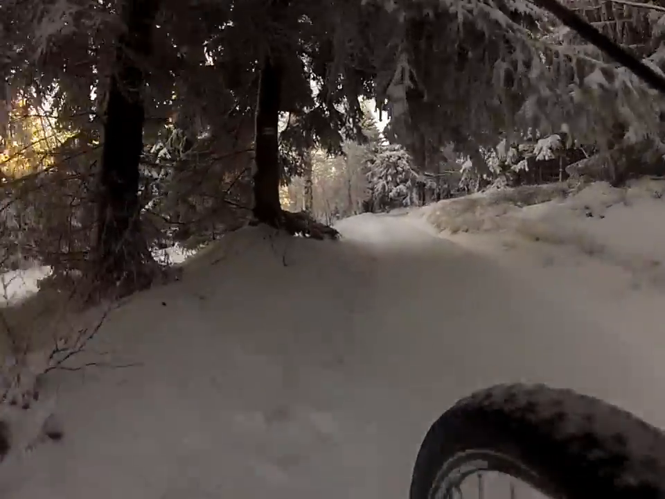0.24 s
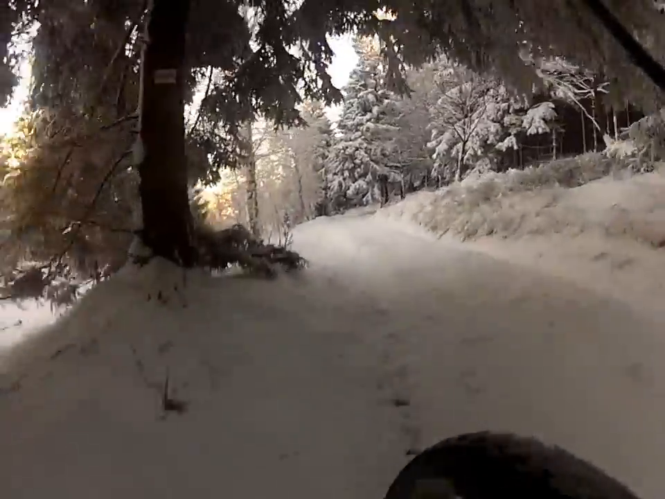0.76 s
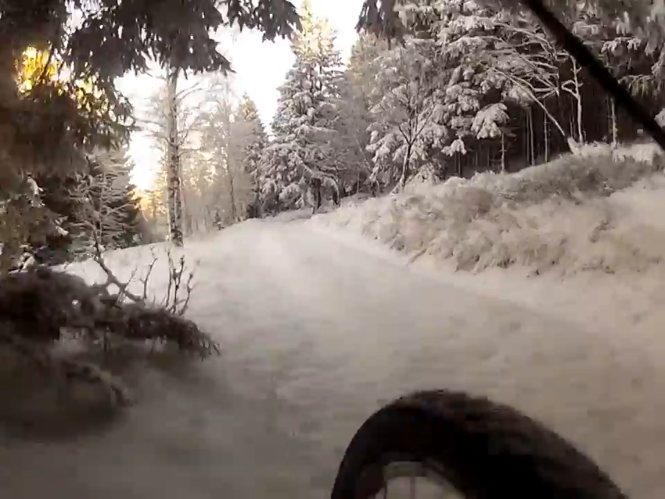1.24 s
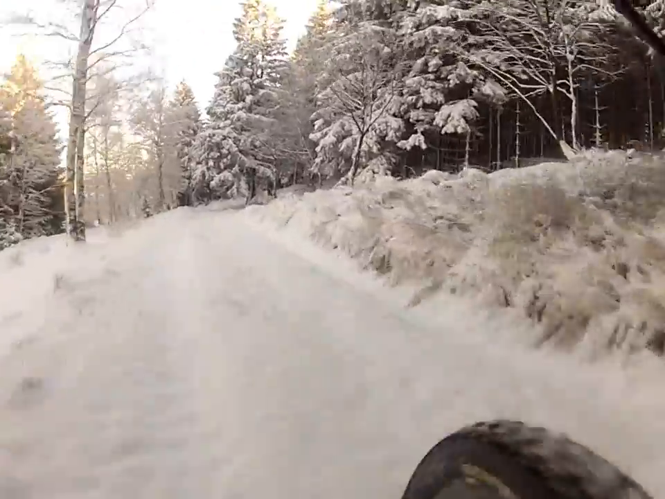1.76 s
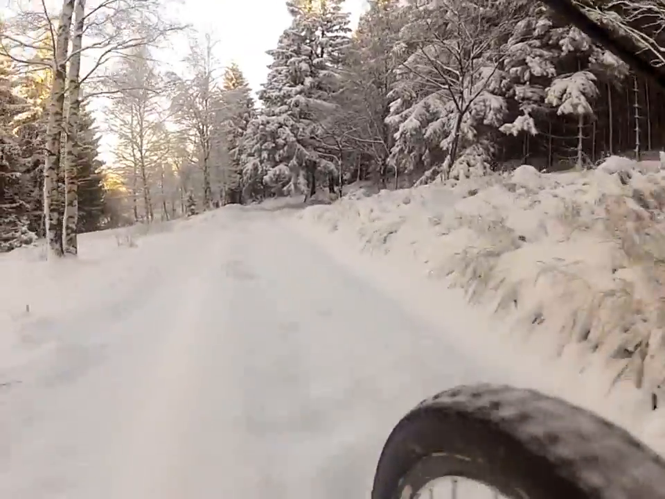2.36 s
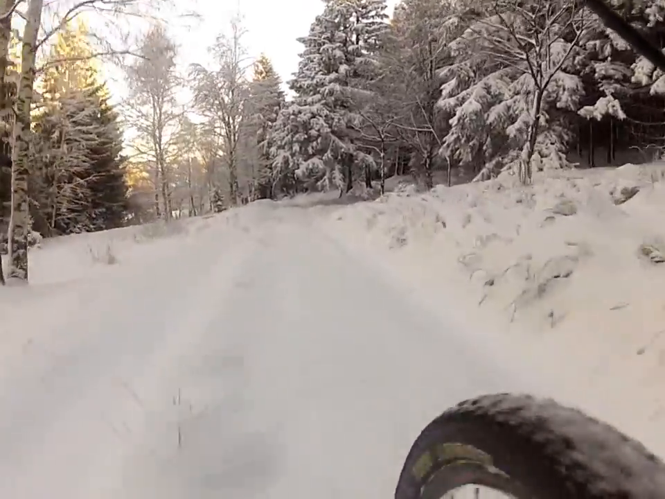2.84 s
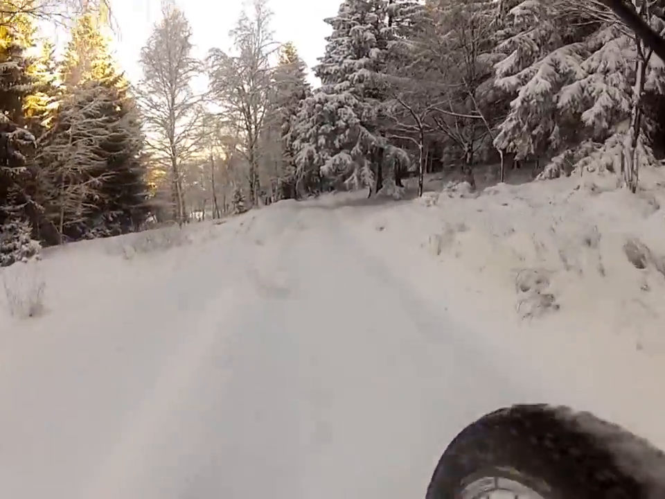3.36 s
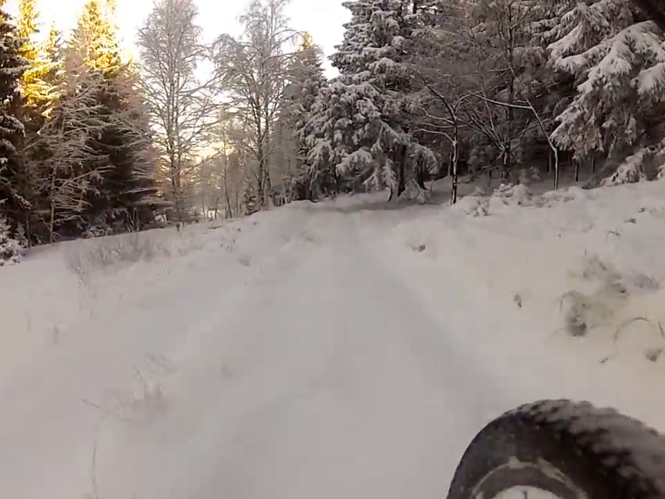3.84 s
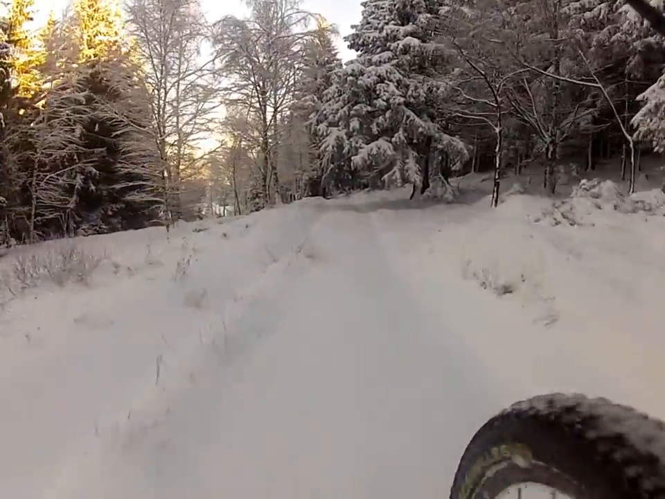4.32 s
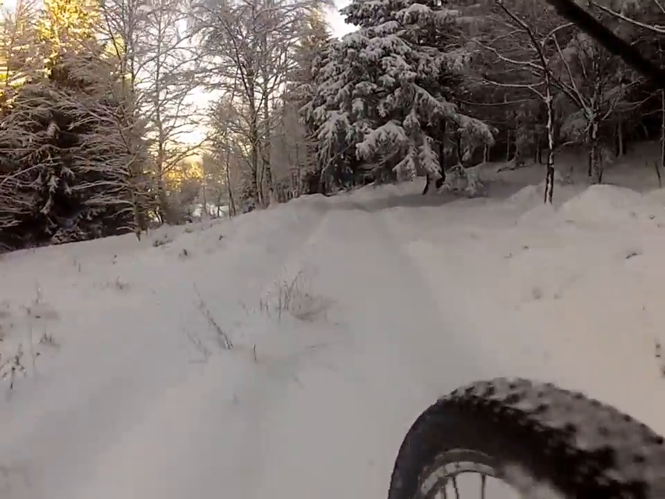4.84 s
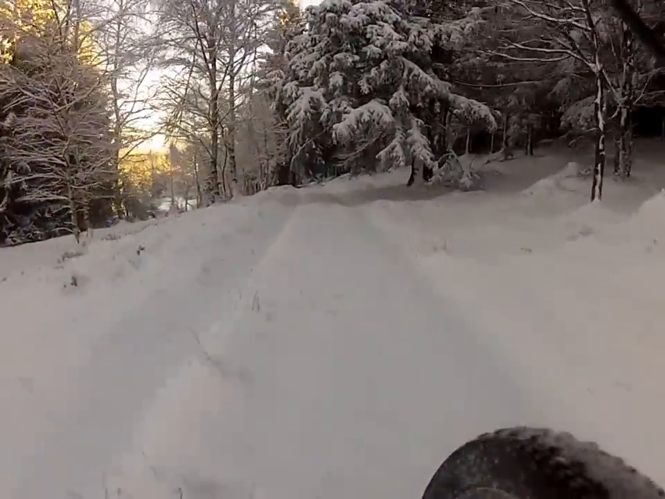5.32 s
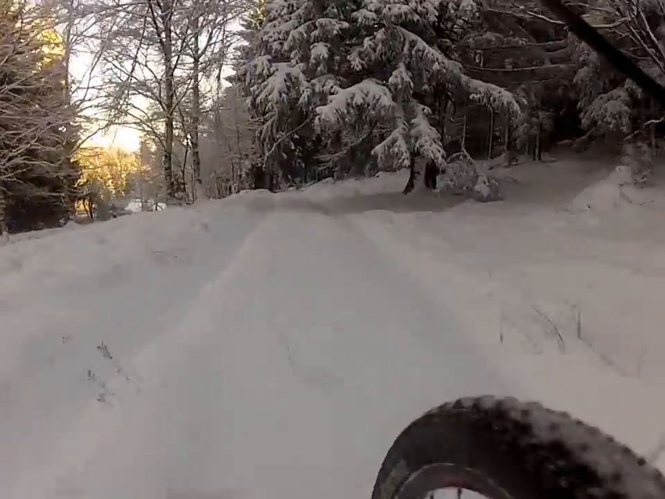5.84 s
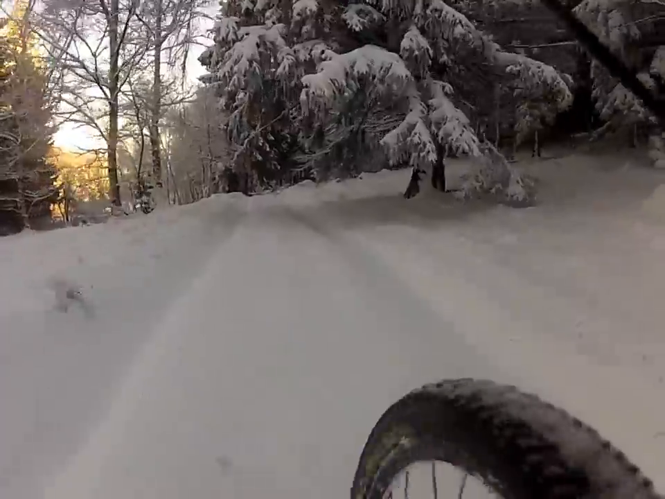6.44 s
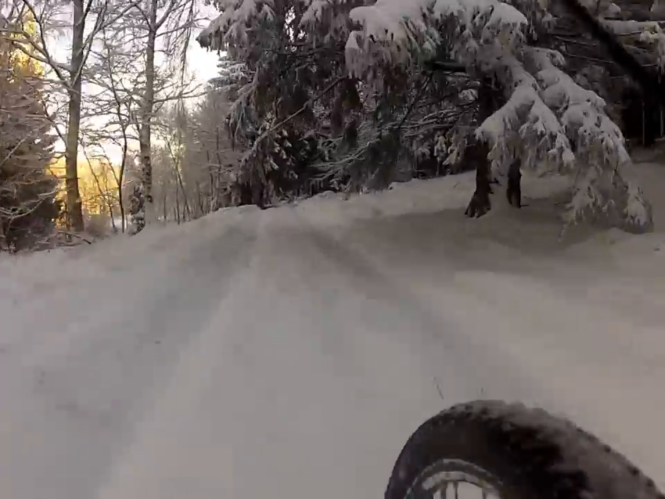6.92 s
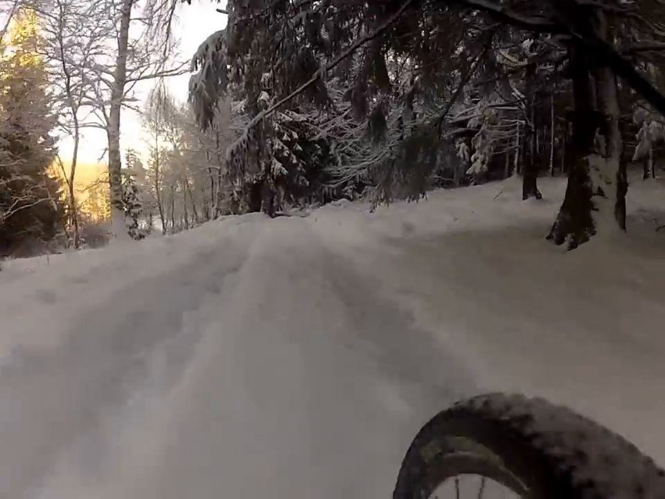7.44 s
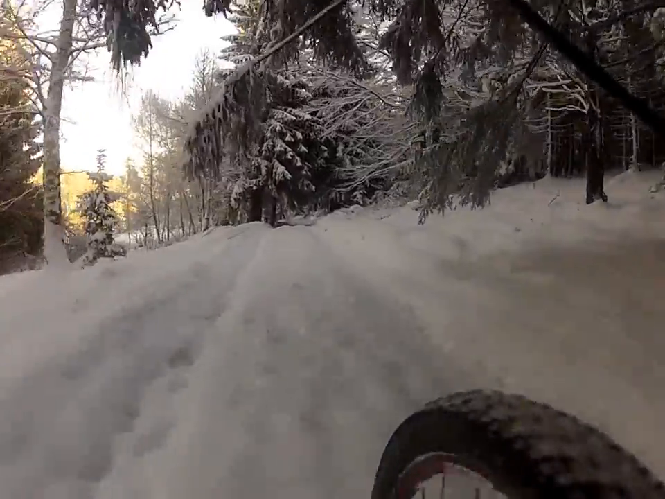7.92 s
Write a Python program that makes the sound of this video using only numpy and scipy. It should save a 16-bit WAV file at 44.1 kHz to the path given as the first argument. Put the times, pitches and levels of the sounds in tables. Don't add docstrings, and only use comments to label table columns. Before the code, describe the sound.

A bicycle rolls along a snowy forest track, picked up through the frame by a sealed camera mounted on it. A very low throb, nearly thirty pulses a second, surges and eases over tyre rumble and crackly snow crunch. A loose part buzzes harshly with the surges. Twig ticks, ice knocks and dull bumps cluster in the first two seconds, then come sparsely, with another hard clack around 5.5 seconds. No room echo.

```python
import sys
import numpy as np
from scipy import signal
from scipy.fft import rfft, irfft, next_fast_len
from scipy.io import wavfile
from scipy.ndimage import uniform_filter1d, minimum_filter1d

SR = 44100
rng = np.random.default_rng(int(sys.argv[2]) if len(sys.argv) > 2 else 0)


def magnitude_from_level(level_db):
    exponent = np.asarray(level_db, float) / 20
    return 10 ** exponent


def persist_wave(psi):
    counts = np.round(np.clip(psi, -1, 1) * 32767).astype(np.int16)
    wavfile.write(sys.argv[1], SR, np.atleast_2d(counts).T)


N = 360738

# (middle [s], peak level [dB], length [s], swing rate [Hz])
LURCHES = [(0.063, -16.5, 0.18, 28.9), (0.316, -10.5, 0.46, 28.68), (0.57, -16, 0.53, 28.38),
           (0.808, -7.8, 0.13, 28.08), (0.997, -6.5, 0.32, 26.66), (1.267, -10.5, 0.51, 30.43),
           (1.548, -7, 0.36, 28.0), (1.855, -8, 0.34, 29.8), (2.001, -19, 0.45, 28.2),
           (2.4, -18.2, 0.29, 29.5), (2.645, -22.5, 0.26, 29.25), (2.996, -5.5, 0.25, 27.52),
           (3.174, -8, 0.18, 27.5), (3.346, -11, 0.48, 28.52), (3.657, -5, 0.31, 26.88),
           (3.895, -15, 0.29, 29.8), (4.071, -7, 0.17, 27.79), (4.46, -11.5, 0.69, 27.32),
           (4.839, -4.0, 0.27, 28.18), (5.106, -13.5, 0.83, 29.91), (5.541, -12.5, 0.47, 27.6),
           (5.86, -15, 0.34, 31.54), (6.109, -11.5, 0.2, 28), (6.347, -8.5, 0.32, 29.55),
           (6.587, -10.5, 0.17, 29.82), (6.851, -12.5, 0.39, 27.97), (7.109, -11, 0.18, 30.4),
           (7.304, -11, 0.22, 26.82), (7.595, -11, 0.62, 29.97), (8.034, -12.9, 0.28, 28.7)]
# (middle [s], peak level [dB], length [s])
RUTS = [(0.677, -19, 0.17), (0.79, -14, 0.11), (0.969, -19.5, 0.95), (1.398, -15, 0.67), (1.664, -16, 0.18),
        (1.824, -15.5, 0.37), (2.941, -22.5, 0.16), (3.279, -23, 0.29), (3.547, -19, 0.15),
        (3.696, -20.5, 0.29), (4.59, -13, 0.12), (4.707, -16.5, 0.099), (4.774, -24, 0.6),
        (5.484, -21, 0.91), (6.35, -21, 0.11), (7.132, -25, 0.33)]
# (middle [s], peak level [dB], length [s])
RIPPLES = [(0.812, -21.5, 0.5), (1.096, -15.5, 0.059), (4.556, -23, 0.31), (5.135, -19.5, 0.23),
           (5.308, -20, 0.33), (5.452, -20, 0.24), (5.852, -21, 0.22), (6.251, -24, 0.21),
           (7.132, -24, 0.27), (7.29, -26, 0.15), (7.519, -22, 0.34)]
# (middle [s], peak level [dB], length [s])
CRUSTS = [(1.096, -33, 0.17), (3.291, -31, 0.31), (3.474, -29, 0.13), (3.774, -28.5, 0.26),
          (3.959, -30.5, 0.12), (4.2, -24.5, 0.1), (4.642, -31, 0.18), (4.935, -31.5, 0.41),
          (5.132, -32.5, 0.23), (5.549, -21.5, 0.067), (5.588, -33.5, 0.8), (5.913, -29.7, 0.36),
          (6.132, -33, 0.28), (6.326, -33, 0.64), (6.655, -27.5, 0.22), (7.159, -29, 0.16),
          (7.349, -29, 0.055), (7.458, -35, 0.37)]
# (time [s], crunch level [dB], looseness of the buzzing part [dB])
SNOW = [(0.0, -37.5, -3), (0.52, -38.5, -4.5), (1.73, -37, -3), (1.85, -31.5, -2.5), (2.16, -36.5, -5.5),
        (2.76, -33, 0), (3.12, -35.5, 1.5), (3.39, -33.5, -3), (4.01, -35, -2), (4.35, -36.5, -3.5),
        (5.4, -35.5, -1), (5.69, -33, -5.5), (6.99, -34.5, -1), (7.27, -34, -1), (7.72, -35.5, -2),
        (8.18, -33.5, -2)]
# (time [s], peak level [dB], ring [Hz])
TWIGS = [(0.6933, -17, 2000), (0.7692, -10.5, 1770), (0.8939, -11.5, 1720), (0.9268, -12.5, 1850),
         (0.9466, -14, 1910), (1.1069, -14, 1730), (1.4263, -8.5, 1890), (1.6511, -0.5, 1950),
         (1.7355, -9, 1800), (1.7544, -13, 2020), (3.9604, -14.5, 2020), (4.2291, -22, 1780),
         (5.22, -12.5, 2100), (5.3772, -26, 2000), (5.529, -16, 2066), (5.5393, -6.5, 1840),
         (6.539, -16.5, 2300), (6.8468, -21, 2070), (6.8653, -14.5, 1902), (7.7099, -15.5, 1999)]
# (time [s], peak level [dB], ring [Hz])
LUMPS = [(1.0814, -15.5, 1130), (1.2381, -20, 1304), (1.3438, -17.5, 1310), (1.5015, -18, 1375),
         (1.7344, -10, 939), (1.9989, -16, 1192), (3.2375, -15, 1066), (4.8743, -16, 1141),
         (5.1228, -24, 1338), (5.3662, -24, 1010), (5.5443, -6.5, 950), (5.8794, -18, 1086),
         (6.0926, -22, 1350), (6.2168, -20.5, 1058), (6.6204, -23, 785), (7.1594, -28, 1126)]
# (time [s], peak level [dB], colour [Hz], width [Hz], decay by 60 dB [s])
SCRAPES = [(.768, -25.5, 2497, 1200, .03), (1.395, -15.5, 330, 198, 0.096), (1.4243, -33, 2707, 1200, .03),
           (1.6496, -20, 3100, 1502, 0.012), (1.7335, -33, 2000, 1716, 0.06), (1.737, -16, 734, 110, 0.059),
           (1.764, -17, 740, 90, 0.1), (1.655, -18, 804, 200, 0.044), (1.76, -31, 2010, 700, 0.35),
           (5.105, -39, 3150, 1500, 0.31), (5.14, -41, 3002, 1498, 0.13), (5.539, -20, 1870, 1090, 0.08),
           (7.5909, -23.5, 3680, 1493, 0.029)]
# (time [s], peak level [dB], ring [Hz], decay by 60 dB [s])
BUMPS = [(0.779, -10, 162, 0.13), (1.119, -9, 267, 0.048), (1.239, -7, 300.5, 0.045),
         (1.351, 4.5, 180, 0.079), (1.399, 11.5, 161.2, 0.03), (1.778, -1, 147, 0.04),
         (2.006, -9, 220, 0.067), (3.267, -22, 144, 0.03), (3.906, -1.5, 260, 0.056),
         (4.197, -11, 160.5, 0.058), (4.683, -1, 174.6, 0.072), (5.544, 5, 260, 0.057),
         (6.267, -1, 149.1, 0.04), (7.663, -8, 238.4, 0.049)]
# (frequency [Hz], width [Hz], level [dB])
FORK_MODES = [(54, 25.5, -9.5), (92.1, 14.7, -3), (75, 67, -12)]
# (frequency [Hz], width [Hz], level [dB])
FRAME_MODES = [(127, 96, -13), (159.2, 55, 4.5), (198.4, 61, -2.5), (248.8, 60, 1), (307, 190, -21.5),
               (422, 159, -19.5), (537.8, 40, -18)]
# (frequency [Hz], width [Hz], level [dB])
CASE_MODES = [(723.4, 46, 4), (762.6, 42.4, 4.5), (977, 101, 1), (1114, 300, -1.5), (1350, 106, -0.5),
              (1594, 900, -6.5), (2000, 203, -2.5), (2457, 253, -8.5), (2870, 200, -17.5)]
# (frequency [Hz], width [Hz], level [dB])
LOOSE_MODES = [(3415, 144, -8), (3680, 810, -11.5), (4592, 440, 0), (5310, 920, -4), (5640, 320, -3)]

REST_DB, SMOOTH_DB, SOFT_DB = -28, -30, -38
TREAD_DB, MIDDLING_DB = -23, -35
JOSTLE, TRAVEL = .58, 1.15


def evened(x):
    return x / np.sqrt(np.mean(x ** 2) + 1e-20)


def noise():
    return rng.standard_normal(N)


def columns(rows):
    s, *values = np.transpose(rows)
    return [np.interp(np.arange(N) / SR, s, v) for v in values]


def swells(rows, rest_db, order=2):
    s, db, length = np.transpose(rows)[:3, :, None]
    t = np.arange(0, N + 64, 64) / SR
    shape = np.cos(np.pi * np.clip((t - s) / length, -.5, .5)) ** order
    power = magnitude_from_level(2 * rest_db) + ((magnitude_from_level(db) * shape) ** 2).sum(0)
    return np.interp(np.arange(N) / SR, t, 10 * np.log10(power))


def drift(top_hz):
    return evened(signal.sosfilt(signal.butter(2, top_hz, fs=SR, output="sos"), noise()))


def grains(per_s, spread_db):
    size = magnitude_from_level(spread_db * np.minimum(rng.exponential(1, N), 4)) * rng.choice([-1., 1.], N)
    return evened(size * (rng.random(N) < per_s / SR))


def ring(x, modes):
    size = next_fast_len(len(x) + SR // 2) * 2
    hz = np.fft.rfftfreq(size, 1 / SR) + 1e-3
    power = sum(magnitude_from_level(2 * db) / (1 + ((hz ** 2 - f ** 2) / (hz * width)) ** 2) ** 2 for f, width, db in modes)
    cepstrum = irfft(np.log(power + 1e-9), size)[:size // 2]
    body = np.exp(rfft(cepstrum, size) - cepstrum[0] / 2)
    return irfft(rfft(x, size) * body, size)[:len(x)]


def spread(x, cycles):
    size = next_fast_len(len(x) + SR // 2)
    hz = np.maximum(np.fft.rfftfreq(size, 1 / SR), 300.)
    lag = np.exp(-2j * np.pi * cycles * (np.log(hz) - hz / 2600))
    return irfft(rfft(x, size) * lag, size)[:len(x)]


def add(mix, s, sound):
    part = mix[round(s * SR):][:len(sound)]
    part += sound[:len(part)]


def swing():
    hz = columns(LURCHES)[-1]
    sway = np.sqrt(2) * np.sin(2 * np.pi * np.cumsum(hz) / SR)
    jostle = evened(ring(noise(), [(29.5, 13.6, 11.0), (40.4, 8.9, -4.5)]))
    free = magnitude_from_level(swells(LURCHES, REST_DB, order=1) - 0.33) * (sway + JOSTLE * jostle)
    return TRAVEL * np.tanh(free / TRAVEL)


def tyre():
    crunch_db = columns(SNOW)[0]
    firm_db = crunch_db - MIDDLING_DB
    shudder_db, lid_db = swells(RUTS, SMOOTH_DB), swells(CRUSTS, SOFT_DB)
    crust_db = lid_db - SOFT_DB
    rumble_db = swells(RIPPLES, TREAD_DB) + .3 * firm_db + 0.14 * crust_db
    rims_db = -40.0 + 0.5 * firm_db + 0.48 * crust_db
    walls_db = crunch_db + 0.49 + 0.13 * crust_db

    shudder = ring(noise(), FORK_MODES)
    rumble = ring(noise() * magnitude_from_level(1.55 * drift(20.4)), FRAME_MODES[:5])
    rims = ring(noise() * magnitude_from_level(3.0 * drift(18.0)), FRAME_MODES[5:])
    lid_snow, wall_snow = [noise() + .45 * grains(per_s=500., spread_db=2.5) for _ in range(2)]
    lid = ring(lid_snow * magnitude_from_level(1.8 * drift(24.0)), CASE_MODES[:2])
    walls = ring(wall_snow * magnitude_from_level(2.23 * drift(61.0)), CASE_MODES[2:])

    low = magnitude_from_level(shudder_db) * shudder / np.std(shudder) + magnitude_from_level(rumble_db) * rumble / np.std(rumble)
    low = low + magnitude_from_level(rims_db) * evened(rims)
    return low + magnitude_from_level(walls_db) * evened(walls) + magnitude_from_level(lid_db + 0.19 * firm_db) * lid / np.std(lid)


def buzz(shake):
    loose_db = columns(SNOW)[-1]
    push = signal.sosfilt(signal.butter(2, 170., fs=SR, output="sos"), shake) * magnitude_from_level(loose_db)
    force = np.maximum(push, -.75 * push)
    seated = signal.lfilter([.0009], [1, -1 + 0.0016], force)
    wobble = magnitude_from_level(2.6 * drift(60.))
    grip = (0.034 + 1.39 * seated) * wobble
    slip = force ** 0.58 / (1 + (grip / (force + 1e-6)) ** 12)
    settled = signal.lfilter([.006], [1, -1 + 0.0063], slip)
    first_tap = np.maximum(slip - settled, 0)
    coasting = -minimum_filter1d(-slip, size=121, origin=60)
    trickle = signal.lfilter([.002], [1, -1 + .002], slip)
    chatter = uniform_filter1d(coasting + 3.95 * first_tap, size=16) + 0.023 * trickle
    taps = grains(per_s=3300., spread_db=2.2)
    return magnitude_from_level(-23.0) * ring(taps * (chatter + 0.012), LOOSE_MODES + [(2930, 1320, -13.0)])


def knocks():
    ring_s, crunch_s = .021, .046
    tick, tail, t = np.zeros(N), np.zeros(N), np.arange(SR // 4) / SR
    rise = np.minimum(t / .0013, 1)
    blows = [(*row, .55) for row in TWIGS] + [(*row, 0) for row in LUMPS]
    for s, db, hz, loss in blows:
        fade = magnitude_from_level(db - 60 * t / (ring_s * magnitude_from_level(.4 * db)))
        add(tick, s, fade * rise * np.sin(2 * np.pi * hz * t))
        crunch = evened(signal.lfilter(*signal.iirpeak(hz, .6, fs=SR), rng.standard_normal(len(t))))
        add(tail, s, magnitude_from_level(db + loss * db - 60 * t / crunch_s) * rise * crunch)
    for s, db, hz, width, t60 in SCRAPES:
        hiss = evened(ring(rng.standard_normal(len(t)), [(hz, width, 0)]))
        add(tick, s, magnitude_from_level(db - 60 * t / t60) * np.minimum(t / 0.0027, 1) * hiss)
    return 1.19 * tick + 1.03 * spread(ring(tail, CASE_MODES), cycles=6.5)


def bumps():
    out, t = np.zeros(N), np.arange(SR // 4) / SR
    rise = np.minimum(t / 0.0097, 1)
    for s, db, hz, t60 in BUMPS:
        add(out, s, magnitude_from_level(db - 60 * t / t60) * rise * np.sin(2 * np.pi * hz * t))
    return out


def scene():
    shake = swing() + tyre() + bumps() + knocks()
    return (shake + buzz(shake))[None]


def roll_off(x):
    return signal.sosfilt(signal.butter(12, 15700, fs=SR, output="sos"), x)


def record(dry):
    hold_hz = 12000
    guard = signal.butter(10, 5750., fs=SR, output="sos")
    loud = signal.sosfilt(guard, np.clip(dry, -1.02, 1.02))
    slow = signal.resample_poly(loud, hold_hz, SR, axis=1)
    held = signal.resample_poly(np.repeat(slow, 4, axis=1), SR, 4 * hold_hz, axis=1)[:, :N]
    edge = signal.firwin(201, 15350., window=("kaiser", 7), fs=SR)
    limited = signal.oaconvolve(held, edge[None], "same")
    return roll_off(np.clip(limited, -1, 1))


dry = scene()
out = record(dry)
persist_wave(out)
```